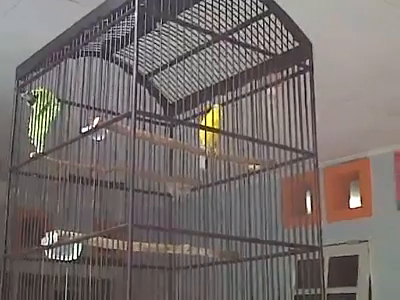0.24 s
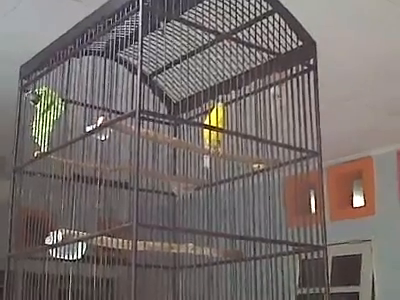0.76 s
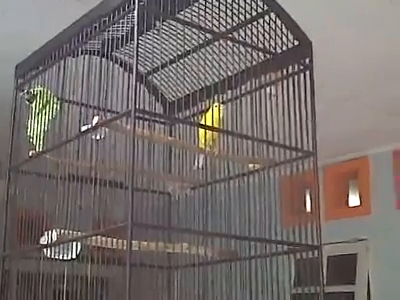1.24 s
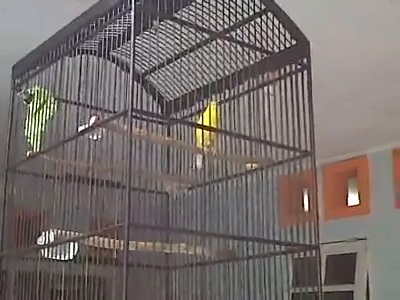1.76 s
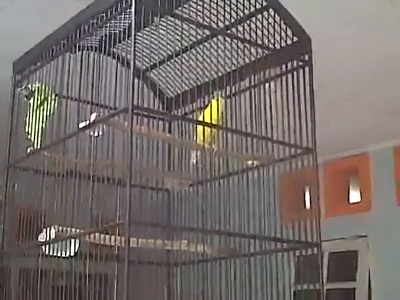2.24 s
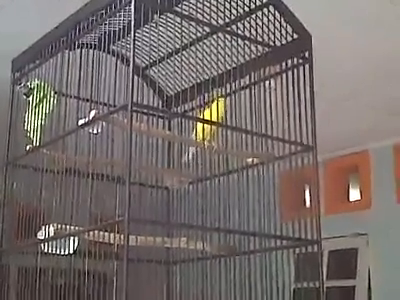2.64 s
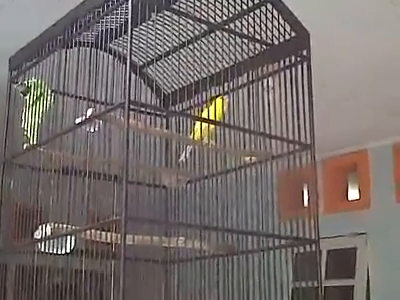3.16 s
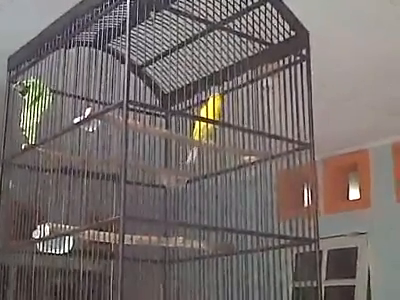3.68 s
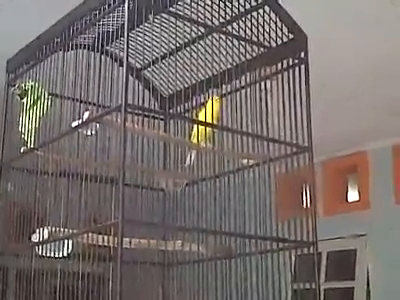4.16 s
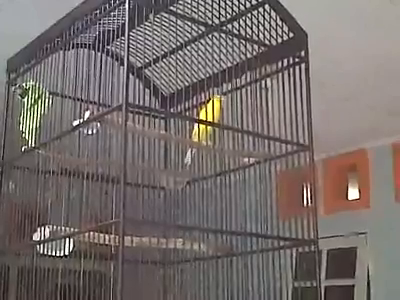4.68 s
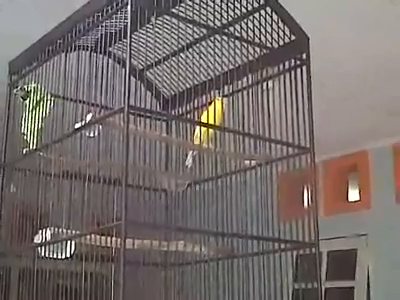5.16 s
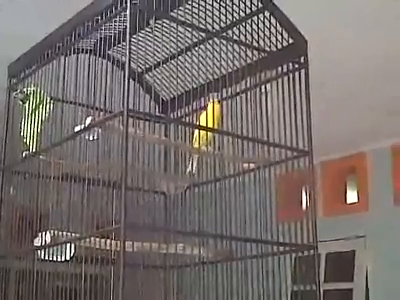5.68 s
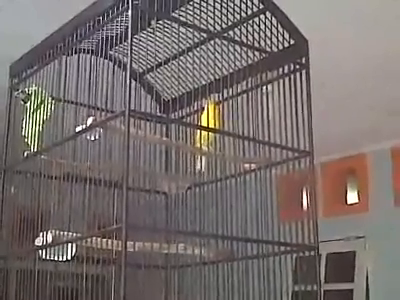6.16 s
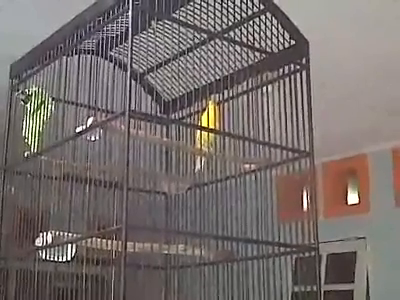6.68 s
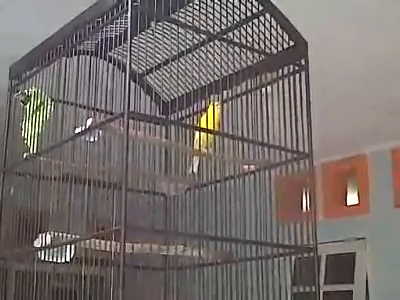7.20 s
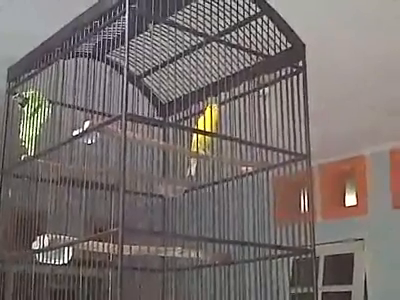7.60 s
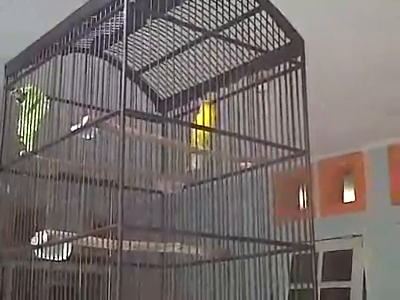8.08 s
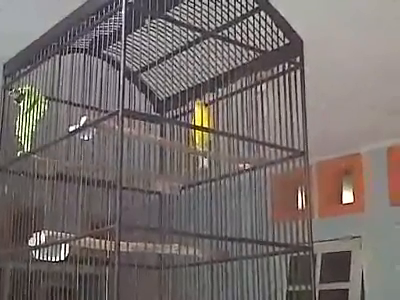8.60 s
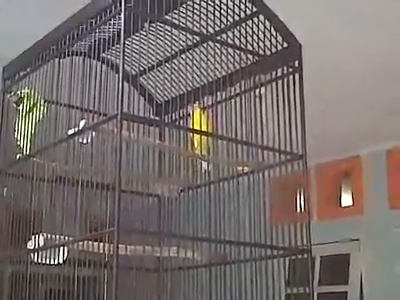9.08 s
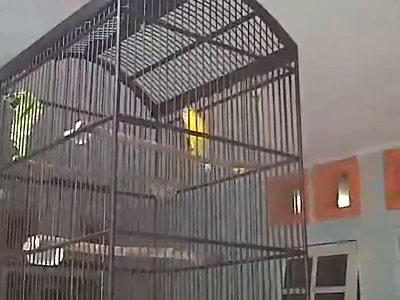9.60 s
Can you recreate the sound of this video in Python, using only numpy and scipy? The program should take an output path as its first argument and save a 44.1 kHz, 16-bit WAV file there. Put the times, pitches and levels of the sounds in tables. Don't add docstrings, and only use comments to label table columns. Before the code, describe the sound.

A canary sings continuously in a hard, echoing room. Quick soft rolls and buzzy trills come first, then sharper chips and a two-note trill, a quickening run of falling sweeps, five slower broad sweeps, rising whistles and finally three loud falling whistles. A second bird chirps faintly from farther off, mostly near the end. Occasional dull distant knocks sit over low rumble and hiss, heard through a small dull-topped camera microphone.

```python
import sys
import numpy as np
from scipy import signal
from scipy.fft import rfft, irfft, next_fast_len
from scipy.io import wavfile
from scipy.ndimage import uniform_filter1d, minimum_filter1d

SR = 44100
rng = np.random.default_rng(int(sys.argv[2]) if len(sys.argv) > 2 else 0)


def invert_db(level):
    return 10 ** (np.asarray(level, dtype=float) / 20)


def store_pcm(level_fs):
    pcm = np.round(np.clip(level_fs, -1, 1) * 32767).astype(np.int16)
    wavfile.write(sys.argv[1], SR, np.atleast_2d(pcm).T)


N = 434385
BEFORE = SR // 4


def evened(x):
    return x / np.sqrt(np.mean(x ** 2) + 1e-20)


def read(points, hz):
    f, value = np.transpose(points)
    return np.interp(np.log(hz + 1), np.log(f + 1), value)


def add(mix, s, sound):
    part = mix[round(s * SR) + BEFORE:][:len(sound)]
    part += sound[:len(part)]


def coloured(x, points):
    size = next_fast_len(len(x) + 4096)
    gain = invert_db(read(points, np.fft.rfftfreq(size, 1 / SR)))
    return irfft(rfft(x, size) * gain, size)[:len(x)]


def canary():
    out = np.zeros(BEFORE + N)
    sing_phrases(out)
    sing_quick_sweeps(out)
    sing_slow_sweeps(out)
    sing_single_notes(out)
    return out


def whistle(s, hz, db, flutter=.002, uneven_db=1.44, edge_ms=2.985):
    t = np.arange(s[0], s[-1], 1 / SR)
    pitch = uniform_filter1d(np.interp(t, s, hz), size=60 + len(t) // 40, mode="nearest")
    wobble = evened(uniform_filter1d(rng.standard_normal(len(t)), 150))
    turns = np.cumsum(pitch * (1 + flutter * wobble)) / SR + rng.random()
    effort = invert_db(np.interp(t, s, db + uneven_db * rng.standard_normal(len(s))))
    edge = np.clip(np.minimum(t - s[0], s[-1] - t) * 1e3 / edge_ms, 0, 1)
    return np.sqrt(2) * effort * np.sin(np.pi / 2 * edge) ** 2 * np.sin(2 * np.pi * turns)


def trill(numbers, marks, spread_db=1.0259):
    every = np.arange(numbers[-1] + 1)
    s, db = (np.interp(every, numbers, column) for column in np.transpose(marks))
    return np.transpose([s, db + spread_db * rng.standard_normal(len(every))])


# (time after start [ms], pitch [Hz], effort [dB])
ROLL_SHAPE = [
    [(-3, 1700, -8), (2, 2150, -8), (8, 2700, -11)],
    [(10, 2600, -3), (18, 3250, -1), (24, 3700, -3)],
    [(28, 3850, 2), (32, 3500, 10), (36, 2900, 7)],
]
BUZZ_SHAPE = [
    [(1, 5850, -8), (5, 5197, -1), (8, 4415, 4.5), (12, 2690, 8.5)],
    [(10, 3192, -5), (14, 713, -9.5)],
]
CHIP_SHAPE = [
    [(-0.5, 7000, -20.5), (8.5, 5100, -10), (9, 4980, -1.5), (14.5, 4450, -5), (23, 3850, -8.5),
     (27, 3509, -1.5), (31.5, 3424, 4), (34, 2455, -3)],
]
TWIN_HIGH_SHAPE = [
    [(6.5, 6600, 1.5), (10, 5976, -5.5), (13.5, 4630, -10.5)],
    [(22.86, 4860, -7), (27.17, 4299, 5), (29.19, 3850, 8), (34.27, 3311, -3), (37.34, 2155, -6)],
]
TWIN_LOW_SHAPE = [
    [(7, 6300, -4.5), (11, 5450, -7), (16.5, 4400, -4.5)],
    [(18.73, 4250, -5.5), (24.3, 3950, 2.5), (28.76, 3600, 3), (32.86, 3299, -6), (36.48, 2086, -9)],
]
RISE_SHAPE = [
    [(2.09, 2300, -8.5), (5.2, 3030, -8), (11.1, 3742, 3.5), (19.4, 4450, 7), (38.9, 4900, 6),
     (53.1, 5200, -17.5), (70, 5450, -4.5), (127.5, 5600, -2.5), (219.2, 5700, -5)],
]
FALL_SHAPE = [
    [(0, 7000, -17.5), (12.184, 5300, -20.5), (19.935, 4950, -14.5), (45.68, 4500, -2), (75.11, 3880, 0.5),
     (111.9, 3480, -3), (151, 3130, -7.5), (188.96, 2925, -6.5), (217.65, 2880, -5.5)],
]
ROLL_NUMBERS = [0, 4, 6, 13, 20]
BUZZ_NUMBERS = [0, 3, 6, 8, 14, 26]
CHIP_NUMBERS = [0, 4, 7, 12]
TWIN_NUMBERS = [0, 2, 3, 10, 14, 19, 22, 31, 38]
# (time [s], level [dB])
ROLL_MARKS = [(-0.15, -53.5), (0.006, -55.5), (0.082, -50), (0.3571, -47.5), (0.6371, -46.5)]
BUZZ_MARKS = [(0.8139, -50.5), (.885, -48.5), (0.9565, -47.5), (1.01, -47.5), (1.163, -47.5), (1.447, -49)]
CHIP_MARKS = [(1.5677, -45), (1.7903, -41), (1.962, -41.5), (2.2456, -43.5)]
TWIN_MARKS = [(2.336, -48.5), (2.425, -45.5), (2.4736, -42), (2.8243, -39), (3.0251, -40.5), (3.2705, -42),
              (3.4183, -38), (3.8571, -40), (4.2021, -38)]
RISE_STARTS = [(8.103, -45), (8.334, -39), (8.575, -37.5)]
FALL_STARTS = [(9.157, -27), (9.474, -27), (9.788, -27)]
# (from [s], to [s])
TWIN_SINKS = (2.95, 3.6)


def sing_phrases(out):
    phrases = [(ROLL_SHAPE, ROLL_SHAPE, trill(ROLL_NUMBERS, ROLL_MARKS)),
               (BUZZ_SHAPE, BUZZ_SHAPE, trill(BUZZ_NUMBERS, BUZZ_MARKS)),
               (CHIP_SHAPE, CHIP_SHAPE, trill(CHIP_NUMBERS, CHIP_MARKS)),
               (TWIN_HIGH_SHAPE, TWIN_LOW_SHAPE, trill(TWIN_NUMBERS, TWIN_MARKS)),
               (RISE_SHAPE, RISE_SHAPE, RISE_STARTS),
               (FALL_SHAPE, FALL_SHAPE, FALL_STARTS)]
    for early, late, starts in phrases:
        for s, level_db in starts:
            detune, stretch = 1 + [.006, .03] * rng.standard_normal(size=2)
            sag = np.interp(s, TWIN_SINKS, [0, 1])
            for a, b in zip(early, late):
                ms, hz, db = ((1 - sag) * np.array(a) + sag * np.array(b)).T
                pace = stretch if ms[-1] < 50 else 1
                add(out, s + ms[0] / 1e3, whistle(ms / 1e3 * pace, hz * detune, db + level_db))


UPPER_EFFORT = [-5.5, -7, -1, 5.5, -1.5]
# (time after the middle [ms], pitch [Hz], effort [dB])
LOWER_VOICE = [(0, 4900, 11.5), (6.84, 4417, 13), (13.805, 3940, 3), (22.25, 3470, 1), (29.18, 2884, 9.5),
               (35.88, 1362, -10)]
# (full gap [Hz], overlap [Hz])
GAP_CLOSES = (5250, 5700)


def quick_sweep(beat, handover_hz, level_db, top_hz=7290, gap_s=.003, entry_db=5):
    lead = .75 * (beat - 0.0601)
    hurry_db = 77 * (lead - 0.044)
    ms, hz, db = np.transpose(LOWER_VOICE)
    change = -lead * (handover_hz - hz[0]) / (top_hz - hz[0])
    upper_end = change - gap_s * np.interp(handover_hz, GAP_CLOSES, [1, -.5])
    s = np.linspace(-lead, upper_end, len(UPPER_EFFORT))
    upper_hz = np.interp(s, [-lead, 0], [top_hz, hz[0]])
    upper = s, upper_hz, np.add(UPPER_EFFORT, level_db + hurry_db)
    lower = np.r_[change, ms / 1e3], np.r_[handover_hz, hz], np.r_[entry_db, db] + level_db
    return upper, lower


# (time of the middle [s], level [dB])
QUICK_MIDDLES = [(4.312, -48.5), (4.437, -47), (4.564, -46), (4.697, -47), (4.819, -46.5), (4.945, -47),
                 (5.069, -47), (5.19, -49), (5.312, -47.5), (5.432, -48), (5.549, -47), (5.667, -47),
                 (5.772, -49), (5.867, -48), (5.958, -47), (6.048, -47.5), (6.14, -47.5), (6.232, -47.5),
                 (6.327, -47), (6.423, -48.5)]
# (time [s], pitch [Hz])
VOICE_CHANGE = [(4.4, 5070), (4.9, 5221), (5.2, 5850), (6.4, 5807)]


def sing_quick_sweeps(out):
    beats = np.diff([s for s, _ in QUICK_MIDDLES])
    for (s, level_db), beat in zip(QUICK_MIDDLES, np.r_[beats[0], beats]):
        handover_hz = np.interp(s, *np.transpose(VOICE_CHANGE))
        for voice in quick_sweep(beat, handover_hz, level_db):
            add(out, s + voice[0][0], whistle(*voice))


# (pitch [Hz], effort [dB])
SLOW_SHAPE = [(7480, -8), (6850, -3), (6320, -10.5), (5850, -1), (5165, 6), (4347, 9.5), (3553, 10),
              (2790, 3), (2096, -9)]
# (time of the middle [s], lead [s], tail [s], level [dB])
SLOW_MIDDLES = [(6.602, 0.086, 0.0842, -43), (6.852, .094, 0.0967, -42.5), (7.114, .096, 0.0903, -41.5),
                (7.378, .104, 0.098, -43), (7.649, .11, 0.0921, -42)]


def sing_slow_sweeps(out):
    hz, db = np.transpose(SLOW_SHAPE)
    for s, lead, tail, level_db in SLOW_MIDDLES:
        times = np.interp(np.linspace(-1, 1, len(hz)), [-1, 0, 1], [-lead, 0, tail])
        add(out, s - lead, whistle(times, hz, db + level_db))


# (time [s], pitch [Hz], level [dB])
SINGLE_NOTES = [
    [(.801, 5106, -58.5), (.812, 5460, -64)],
    [(1.522, 6857, -47.5), (1.53, 5264, -63), (1.538, 4610, -53), (1.545, 3155, -38)],
    [(6.495, 7163, -49.5), (6.54, 6805, -52), (6.565, 6320, -53.5)],
    [(7.79, 3109, -39), (7.83, 4040, -33.5), (7.87, 4311, -31.5), (7.91, 4767, -35.5), (7.95, 4903, -34),
     (7.985, 4981, -33.5)],
    [(8.887, 4856, -45.5), (8.9, 4587, -33), (8.928, 3656, -26.5), (8.97, 3463, -30), (9.05, 3365, -38),
     (9.1, 3425, -30.5), (9.125, 3370, -44.5)],
]


def sing_single_notes(out):
    for note in SINGLE_NOTES:
        add(out, note[0][0], whistle(*np.transpose(note)))


# (time [s], pitch [Hz], level [dB])
FAR_CHIRPS = [
    [(0, 5000, -60), (.024, 5394, -60), (.06, 5310, -61), (.1, 5205, -62), (.15, 5260, -68.5)],
    [(9.22, 5410, -62), (9.33, 5330, -67.5)],
    [(9.41, 5585, -54), (9.465, 5542, -57.5)],
    [(9.54, 5292, -64), (9.6, 5252, -64.5)],
    [(9.722, 5588, -56.5), (9.78, 5450, -51.5)],
]


def neighbour():
    out = np.zeros(BEFORE + N)
    for chirp in FAR_CHIRPS:
        add(out, chirp[0][0], whistle(*np.transpose(chirp), flutter=0.028, edge_ms=5.6))
    return out


# (time [s], peak level [dB], pitch [Hz], t60 [s])
FAR_KNOCKS = [(0.17, -54.5, 540, 0.62), (0.775, -53, 507, 0.414), (1.18, -48, 485, 0.19),
              (1.397, -54.5, 570, 0.58), (2.761, -57.5, 440, 0.33), (3.638, -58, 538, 0.32),
              (9.235, -52, 1390, 0.37)]


def knocks():
    out, t = np.zeros(BEFORE + N), np.arange(SR // 3) / SR
    for s, db, hz, t60 in FAR_KNOCKS:
        band = signal.butter(2, [hz * .72, hz * 1.524], "band", fs=SR, output="sos")
        ring = evened(signal.sosfilt(band, rng.standard_normal(len(t))))
        add(out, s, invert_db(db - 6.0 - 60 * t / t60) * ring * np.minimum(t / 0.0097, 1))
    return out


# (frequency [Hz], t60 [s])
TAIL_DECAY = [(500, 0.945), (2000, 0.333), (3500, 0.4126), (5000, 0.472), (7000, 0.3097)]
# (delay [ms]), then (level [dB])
SLAP_MS = np.array([1.7, 3.5, 7.8, 10.3, 11.3, 13, 16.5, 18.2])
SLAP_DB = np.array([-8.0, -9.5, -10, -12.5, -11, -11, -13, -5.5])
# (frequency [Hz], level [dB])
WALL_COLOUR = [(1500, -0.5), (3000, 2.5), (4500, -1.5), (5300, -3), (6000, -12), (7000, -1.5)]


def room(x, tail_db=2.0, turns_per_s=0.3498, spread_ms=.6):
    out, t = np.zeros(len(x)), np.arange(len(x)) / SR
    for k in range(3):
        taps = np.zeros(SR // 2)
        at = np.arange(0, len(taps) - 16, 16)
        taps[at + rng.integers(0, 16, len(at))] = rng.choice([-1., 1.], len(at))
        hz, lag, z = signal.stft(taps, SR, nperseg=128)
        decay = invert_db(-60 * lag / read(TAIL_DECAY, hz)[:, None])
        tail = signal.istft(z * decay, SR, nperseg=128)[1]
        tail *= np.clip(np.arange(len(tail)) / SR / 0.0073, 0, 1)
        tail *= invert_db(tail_db) / np.linalg.norm(tail)
        delay_ms = SLAP_MS + spread_ms * rng.uniform(-1.1685, 1, len(SLAP_MS))
        tail[(delay_ms * SR / 1e3).astype(int)] += invert_db(SLAP_DB)
        share = np.sqrt(2 / 3) * np.cos(np.pi * (turns_per_s * t + k / 3))
        out += signal.oaconvolve(x * share, tail)[:len(x)]
    return x + coloured(out, WALL_COLOUR)


# (frequency [Hz], level [dB per Hz])
AIR_SPECTRUM = [(15, -30.5), (60, -18), (103, -23), (182, -10.5), (283, -1), (680, -9.5), (1250, -13),
                (2400, -15.5), (4000, -16.5), (6000, -24.5), (7000, -23.5), (7500, -29.5), (8500, -31.5),
                (9200, -50)]


def air(level_db=-63.5, patch_db=0.51):
    frames, hz = N // 256 + 5, np.fft.rfftfreq(1024, 1 / SR)
    a, b, patches = rng.standard_normal((frames, 513, 3)).T
    patches = evened(uniform_filter1d(uniform_filter1d(patches, 14, 0), 20, 1))
    z = (a + 1j * b) * invert_db(read(AIR_SPECTRUM, hz)[:, None] + patch_db * patches)
    return invert_db(level_db) * evened(signal.istft(z, nperseg=1024, noverlap=768)[1][:N])


# (frequency [Hz], level [dB])
MIC_RESPONSE = [(100, 0), (5000, -2), (5800, -3), (6400, -10), (7000, -20), (7400, -36.5), (8000, -59.5),
                (22000, -81)]


def scene():
    birds = coloured(room(canary() + neighbour()), MIC_RESPONSE)
    return ((birds + knocks())[BEFORE:] + air())[None]


# (frequency [Hz], level [dB])
MIRROR_LEAK = [(7900, -63), (8500, -12.5), (9000, -13), (9500, -27), (10000, -34), (10300, -73)]


def sampling_mirror(x, sampling_hz=16000):
    mirror = 2 * x * np.cos(2 * np.pi * sampling_hz * np.arange(N) / SR)
    return coloured(mirror, MIRROR_LEAK)


# (frequency [Hz], share [-])
OPEN_SHARE = [(5500, 1), (6500, .75), (7200, .45), (8300, .35), (9200, .15), (10000, .12)]


def flickering_treble(x, mask_db=34, jump_db=12, leak_db=-22):
    hz, _, z = signal.stft(x, SR, nperseg=256)
    power = uniform_filter1d(abs(z) ** 2, size=3, axis=1)
    ranked = np.sort(power, axis=1)
    rank = ((1 - read(OPEN_SHARE, hz)) * (power.shape[1] - 1)).astype(int)
    weak = power < ranked[np.arange(len(hz)), rank][:, None]
    loudest = -minimum_filter1d(-power.max(axis=0), size=9, origin=-4)
    song_band = abs(hz[:, None] - 3900) < 1400
    masked = (power < loudest * invert_db(-2 * mask_db)) & song_band
    masked &= power[hz > 2000].max(axis=0) < loudest * invert_db(-2 * jump_db)
    return signal.istft(z * np.where(weak | masked, invert_db(leak_db), 1), SR, nperseg=256)[1][:N]


def low_pass(x):
    return signal.sosfilt(signal.butter(12, 10100, fs=SR, output="sos"), x)


def record(dry):
    mix = flickering_treble(dry[0] + sampling_mirror(dry[0]))[None]
    mix = mix * np.clip((N - np.arange(N)) / 200, .7, 1)
    return low_pass(mix)


dry = scene()
out = record(dry)
store_pcm(out)
```